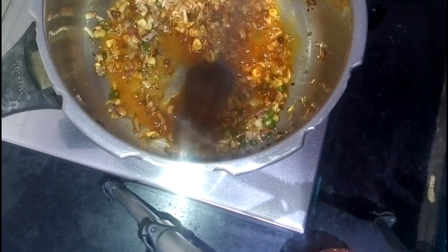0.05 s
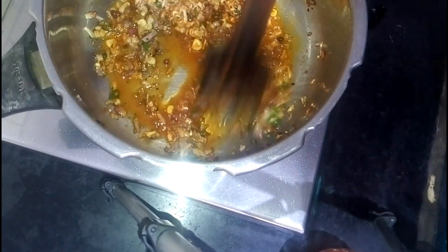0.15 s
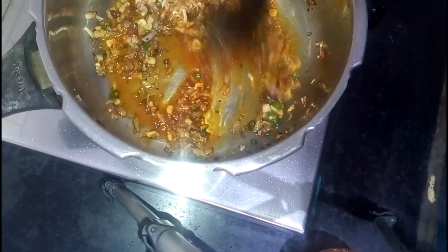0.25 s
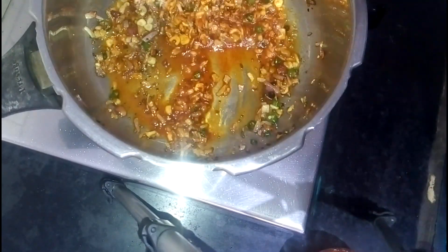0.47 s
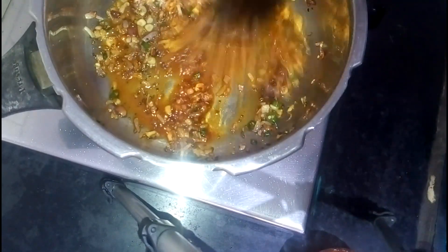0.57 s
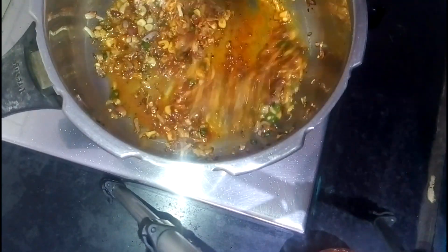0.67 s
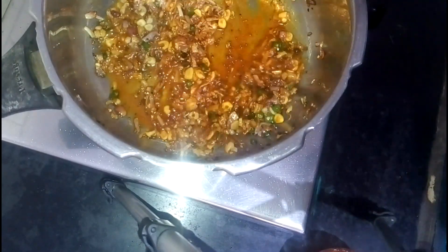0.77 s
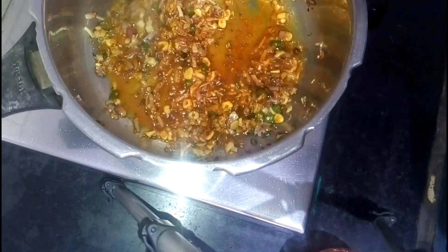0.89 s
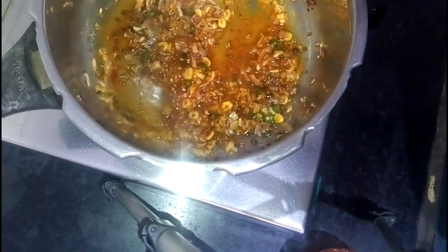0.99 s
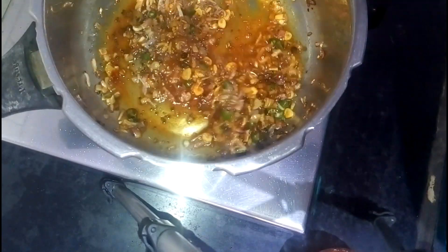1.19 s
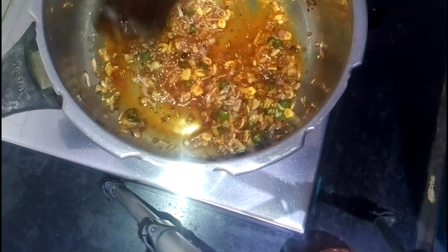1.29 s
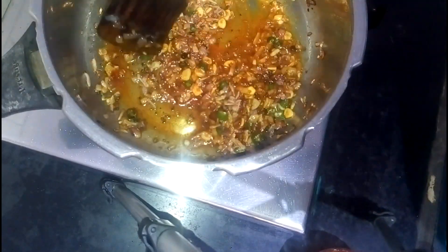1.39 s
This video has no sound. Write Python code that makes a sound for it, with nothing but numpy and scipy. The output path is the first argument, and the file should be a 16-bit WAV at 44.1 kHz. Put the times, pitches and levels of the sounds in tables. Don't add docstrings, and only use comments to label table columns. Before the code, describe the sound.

Close mono phone pickup of frying in a heavy metal pot: constant fizzing and crackling, a dull spatula touch and scrape, one loud ringing knock midway, then softer scraping, small oil spits and low pot thumps.

```python
import sys
import numpy as np
from scipy import signal
from scipy.fft import rfft, irfft, next_fast_len
from scipy.io import wavfile
from scipy.ndimage import uniform_filter1d, map_coordinates

SR = 44100
rng = np.random.default_rng(int(sys.argv[2]) if len(sys.argv) > 2 else 0)


def persist_wave(psi):
    counts = np.round(np.clip(psi, -1, 1) * 32767).astype(np.int16)
    wavfile.write(sys.argv[1], SR, np.atleast_2d(counts).T)


def makeup_ratio(level_db):
    decades = np.asarray(level_db, float) / 20
    return 10 ** decades


N = 63945

# mode_hz, twin_hz
WALL_PAIRS_HZ = [(213, 207), (381, 390), (586, 560), (666, 646), (904, 800), (1061, 1110), (1436, 1318),
                 (1533, 1526), (2352, 2335), (2762, 2740), (3381, 3392), (4475, 4507), (4868, 4916),
                 (5346, 5577)]
# level_db, twin_db (relative to the first), t60_s, swell_s
WALL_RING = [(5.5, -1, 0.098, 0.034), (-1, -18, .3, .025), (-7, -4, 0.14, .008), (-8.5, -8, 0.42, 0.0014),
             (-9.5, -8.5, 0.35, 0.02), (-11, -19, 0.48, 0.0023), (-6.5, -5, 0.26, 0.00057),
             (-11.5, 5, 0.24, 0.0011), (-16.5, -10, 0.44, 0.00047), (-22, 2, 0.36, 0.0014),
             (-5.5, -32, 0.27, 0.0017), (-19, -5, 0.51, .001), (-14, 2, 0.4, .001), (-9, 2, 0.27, 0.00072)]


def unit(x):
    return x / np.sqrt(np.mean(x ** 2) + 1e-20)


def along(points, hz):
    f, v = np.transpose(points)
    return np.interp(np.log(hz + 1), np.log(f + 1), v)


def curve(rows):
    return np.interp(np.arange(N) / SR, *np.transpose(rows))


def wobble(rate):
    knots = rng.standard_normal(int(N * rate / SR) + 4)
    return map_coordinates(knots, [np.arange(N) * rate / SR])


def filtered(x, response):
    m = next_fast_len(len(x) + SR // 2)
    return irfft(rfft(x, m) * response(np.fft.rfftfreq(m, 1 / SR)), m)[:len(x)]


def rush(spectrum, patchy_db):
    z = signal.stft(rng.standard_normal(N), nperseg=256)[2]
    field = uniform_filter1d(rng.standard_normal(z.shape), size=6, axis=0)
    field = uniform_filter1d(field, size=5, axis=1)
    x = signal.istft(z * makeup_ratio(patchy_db * unit(field)), nperseg=256)[1][:N]
    return unit(filtered(x, lambda hz: makeup_ratio(along(spectrum, hz))))


def bubbles():
    per_s, centre_hz, spread_log, size_db, cycles = 1500, 5110, 0.425, 0.5, 4
    u, g = rng.random((6000, 2)), rng.standard_normal(6000)
    live = np.arange(6000) < per_s * N / SR
    hz = np.clip(centre_hz * np.exp(spread_log * g), 800, 14000)[:, None]
    t = np.arange(192) / SR
    size = live * makeup_ratio(-size_db * np.log(1 - .97 * u[:, 1]))
    envelope = np.exp(-t * hz / cycles) * (1 - np.exp(-t * hz))
    grains = size[:, None] * np.sin(2 * np.pi * hz * t) * envelope
    at = (u[:, :1] * N).astype(int) + np.arange(192)
    crackle = np.bincount(at.ravel(), grains.ravel(), N + 192)[:N]
    return unit(filtered(crackle, lambda f: f / (f + 1500)))


def sizzle():
    # time_s, level_db
    frying = [(0, -45.5), (.2, -44), (.5, -45), (.85, -44.5), (1.08, -43.5), (1.25, -45), (1.45, -44.5)]
    # freq_hz, density_db_per_hz
    fizz = [(180, -34), (350, -12.5), (1250, -6.5), (1800, -8), (3500, -6.5), (5600, 0), (9000, -10),
            (15500, -10)]
    # start_s, peak_db, pitch_hz
    spits = [(.4643, -38, 6000), (.4918, -35, 5500), (1.0308, -31, 5000), (1.060, -33, 6000),
             (1.071, -33, 8000), (1.321, -37, 14000), (1.3917, -30, 5600), (1.393, -31, 10000),
             (1.426, -36, 5500), (1.336, -36, 5500), (.345, -34, 2100), (1.085, -36, 2000)]
    crackle_db, spit_db, spit_t60_s = -9, -8, .02
    strength = makeup_ratio(curve(frying) + 1.1 * wobble(40.53))
    hiss = rush(fizz, patchy_db=1.0)
    out = np.pad(strength * (hiss + makeup_ratio(crackle_db) * bubbles()), (0, SR))
    t = np.arange(2048) / SR
    for s, db, hz in spits:
        puff = filtered(rng.standard_normal(2048), lambda f: np.exp(-(np.log((f + 1) / hz) / 0.3) ** 2))
        out[round(s * SR):][:2048] += makeup_ratio(db + spit_db - 60 * t / spit_t60_s) * unit(puff)
    return out[:N]


def kitchen():
    # freq_hz, density_db_per_hz
    room = [(15, -57), (30, -18), (60, -10), (105, -4.5), (200, -14.5), (480, -26.5), (640, -45),
            (1200, -3.5)]
    return makeup_ratio(-60) * rush(room + [(1500, -120)], patchy_db=-2.5)


def scrape():
    # time_s, level_db
    pressure = [(0, -59), (.215, -92), (.232, -46), (.29, -47), (.325, -46), (.35, -40.5), (.385, -46.5),
                (.5, -53), (.57, -54), (.6, -35.5), (.75, -48.5), (.99, -51.5), (1.034, -41),
                (1.046, -45.5), (1.075, -43), (1.135, -47), (1.165, -43.5), (1.215, -45.5), (1.235, -51),
                (1.45, -54)]
    # freq_hz, density_db_per_hz
    bare = [(150, -9), (300, 4), (1000, -3), (2200, -7), (3500, -5), (5500, -3), (8000, -12), (15000, -24)]
    # freq_hz, density_db_per_hz
    spiced = [(150, -9), (300, 4), (1000, -1.5), (2200, -0.5), (3000, 1.5), (5500, 3.5), (8000, -5),
              (15000, -4.5)]
    ring_db, stir_from_s, grit_per_s, grit_db = -9.5, 0.844, 200, 2

    def wall(f, width_hz=30):
        return sum(makeup_ratio(row[0]) * 1j * f * width_hz / (c * c - f * f + 1j * f * width_hz)
                   for (c, _), row in zip(WALL_PAIRS_HZ, WALL_RING))

    late = np.clip((np.arange(N) / SR - stir_from_s) * 10, 0, 1)
    rub = (1 - late) * rush(bare, patchy_db=0.0) + late * rush(spiced, patchy_db=2.0)
    rub = rub + makeup_ratio(ring_db) * unit(filtered(rng.standard_normal(N), wall))
    return makeup_ratio(curve(pressure) + 1.2 * wobble(40.4) + grit_db * wobble(grit_per_s)) * unit(rub)


def wall_modes(t, hard):
    # freq_hz, level_db, t60_s, swell_s
    knock = [(1076, -10, .22, .003), (658, 0, .12, .012), (1450, -3, .08, .001), (4780, -14, .25, .002),
             (4812, -15, .25, .002), (4398, -16, .25, .002), (3500, -16, .25, .002), (4100, -8, .1, .001),
             (2550, -17, .25, .002), (2620, -17, .2, .002), (5310, -16, .2, .002), (5927, -18, .21, .002),
             (1730, -22, .2, .002), (830, -12, .08, .002)]
    flutter_db, flutter_per_s = 1.3, 53.5
    modes = np.zeros(len(t))
    for (hz, twin_hz), (level, twin_db, t60, swell) in zip(WALL_PAIRS_HZ, WALL_RING):
        flutter = flutter_db * np.log1p(hz / 1000) * wobble(flutter_per_s)[:len(t)]
        pair = np.sin(2 * np.pi * hz * t) - makeup_ratio(twin_db) * np.sin(2 * np.pi * twin_hz * t)
        modes += makeup_ratio(level - 60 * t / t60 + flutter) * (1 - np.exp(-t / swell)) * pair
    for hz, level, t60, swell in knock:
        modes += hard * makeup_ratio(level - 60 * t / t60) * (1 - np.exp(-t / swell)) * np.sin(2 * np.pi * hz * t)
    return modes


def blows():
    # start_s, peak_db, hardness (0-1), ring_db, body_db
    hits = [
        (0.2239, -22, 0.09, -7.5, 7.5),
        (0.575, -8, 0.85, 5.5, 2),
    ]
    # centre_hz, width_hz, level_db
    clusters = [(401, 77, -4.5), (651.4, 78, -3.5), (1068, 110, 0.5), (1490, 340, -1), (2253, 157, 3),
                (2778, 210, 3.5), (3510, 220, 0), (4040, 144, -1), (4440, 130, -1.5), (4886, 190, 2.5),
                (5400, 390, -5.5), (6350, 660, -7), (6830, 790, -2)]
    # freq_hz, density_db_per_hz
    clang_spectrum = [(150, -39), (400, 6.5), (700, 6), (1500, 0), (1900, -4.5), (5000, 6), (7200, -2.5),
                      (16000, 4)]
    # freq_hz, t60_s
    clang_t60 = [(300, 0.74), (1500, 0.24), (5000, 0.27), (8000, 0.2), (14000, 0.055)]
    # freq_hz, density_db_per_hz
    crack_spectrum = [(200, -26), (800, -10), (2000, -9), (5500, 2), (7500, -4), (11000, -16), (16500, -13)]
    clang_db, strike_db, crack_db, crack_t60_s = -17.5, 7, -5.5, 0.027
    soft_hz, hard_hz = 480, 29300

    def bunches(f):
        return 0.047 + sum(makeup_ratio(db) * 1j * f * w / (c * c - f * f + 1j * f * w) for c, w, db in clusters)

    out, t = np.zeros(N + SR), np.arange(SR // 2) / SR
    strike = sum(makeup_ratio(db) * np.sin(2 * np.pi * (c * t + rng.random())) * np.exp(-np.pi * w * t / 2)
                 for c, w, db in clusters)
    strike = unit(strike * (1 - np.exp(-t / 0.0022))) / 20
    for s, db, hard, ring_db, body_db in hits:
        modes = wall_modes(t, hard)
        f, frames, z = signal.stft(rng.standard_normal(len(t)), SR, nperseg=128)
        z = z * makeup_ratio(along(clang_spectrum, f)[:, None] - 60 * frames / along(clang_t60, f)[:, None])
        clang = filtered(signal.istft(z, SR, nperseg=128)[1][:len(t)], bunches)
        clang = clang / clang[:400].std() * (1 - np.exp(-t / 0.00019))
        edge_hz = soft_hz * (hard_hz / soft_hz) ** hard
        body = makeup_ratio(ring_db - 18.5) * modes + makeup_ratio(clang_db + body_db) * (clang + makeup_ratio(strike_db) * strike)
        body = filtered(body, lambda f: 1 / (1 + 1j * f / edge_hz) ** 2)
        crack = unit(filtered(rng.standard_normal(len(t)), lambda f: makeup_ratio(along(crack_spectrum, f))))
        crack = makeup_ratio(crack_db - 60 * t / crack_t60_s) * (1 - np.exp(-t / 0.0014)) * crack
        out[round(s * SR):][:len(t)] += makeup_ratio(db) * (body + crack)
    return out[:N]


def nudges():
    # start_s, level_db, pitch_hz, t60_s
    tones = [(0.23, -45, 669, 0.55), (0.26, -52, 394, 0.88), (0.422, -67, 780, 0.45),
             (1.06, -50, 386, .5), (1.105, -50, 2750, .2), (1.198, -51.5, 420, 0.35),
             (1.148, -48.5, 1100, 0.38), (0.257, -48, 840, .2), (0.273, -53, 1070, .2),
             (0.358, -54, 570, .4), (1.055, -56, 2700, 0.48), (1.075, -53, 1180, 0.16),
             (1.1, -45, 1000, 0.17), (1.4, -54, 1400, 0.14), (1.032, -39, 6500, .08),
             (1.034, -44, 4500, .08), (1.058, -41, 6350, .08), (1.07, -42, 5900, .08),
             (1.094, -45, 3000, 0.09), (1.118, -46.5, 3300, 0.088), (1.158, -50, 5400, .07),
             (1.16, -47, 3950, .08), (1.181, -45, 6400, .08), (1.214, -42, 5100, .08),
             (.3, -52.5, 665, .5), (.348, -41, 5500, .06)]
    swell_share = 0.017
    t, out = np.arange(N) / SR, np.zeros(N)
    for s, db, hz, t60 in tones:
        since = (t - s).clip(0)
        swell = 1 - np.exp(-since / (swell_share * t60))
        out += makeup_ratio(db - 60 * since / t60 + 1.1 * wobble(32.0)) * swell * np.sin(2 * np.pi * hz * t)
    return out


def rocking():
    # peak_s, level_db, length_s
    thumps = [
        (0.233, -48, 0.0084),
        (0.328, -50, 0.061),
        (0.432, -56.5, 0.039),
        (0.616, -50.5, 0.024),
        (0.683, -52.5, 0.025),
        (0.746, -53, 0.026),
        (0.996, -46.5, 0.0094),
        (1.127, -57.5, 0.051),
        (1.283, -53.5, 0.03),
    ]
    # freq_hz, density_db_per_hz
    rumble = [(25, -35), (50, -21), (85, -6.5), (115, -13.5), (160, -17), (300, -25)]
    grate_hz, rough_db = 86, 6
    t = np.arange(N) / SR
    power = sum(makeup_ratio(2 * db) * np.exp(-((t - s) / length) ** 2) for s, db, length in thumps)
    tone = np.sqrt(2) * np.sin(2 * np.pi * grate_hz * np.cumsum(1 + .06 * wobble(6.8)) / SR)
    return np.sqrt(power) * unit(tone + makeup_ratio(rough_db) * rush(rumble, patchy_db=-7.0))


def floor_hum():
    # peak_s, rms_db, pitch_hz, rise_s, fall_s
    pushes = [(0.25, -32, 228.1, 0.012, 0.019), (.32, -42, 235.1, 0.02, 0.018),
              (0.373, -35, 234.3, 0.024, 0.015), (0.438, -45.5, 244.9, 0.014, 0.041),
              (0.529, -64, 236.8, 0.025, 0.012), (0.62, -30.5, 241.7, 0.023, 0.039),
              (0.736, -33, 240.8, 0.035, 0.035), (.84, -45.5, 238.8, 0.06, 0.023),
              (.974, -42, 231, .03, .011), (1.004, -38.5, 235, .008, .015), (1.186, -41, 233, .016, .014),
              (1.08, -43, 243.4, 0.037, 0.032), (1.215, -57, 227, .015, 0.02),
              (1.255, -51.5, 241.3, 0.027, 0.024)]
    plateau = 2.3
    rest_db, flutter_db = -62, 1.4
    t = np.arange(N) / SR
    power = np.array([makeup_ratio(2 * db) * np.exp(-np.abs((t - s) / np.where(t < s, rise, fall)) ** plateau) + 1e-12
                      for s, db, _, rise, fall in pushes])
    total = power.sum(axis=0)
    hz = np.array(pushes)[:, 2] @ power / total
    in_pot = (t > pushes[0][0]) * (t < pushes[-1][0])
    level = np.sqrt(2 * (total + makeup_ratio(2 * rest_db) * in_pot)) * makeup_ratio(flutter_db * wobble(60.2))
    return level * np.sin(2 * np.pi * np.cumsum(hz + 5 * wobble(25.4)) / SR)


def scene():
    mono = sizzle() + kitchen() + scrape() + blows() + nudges() + rocking() + floor_hum()
    return np.array([mono, mono])


def band_limit(x):
    return signal.sosfilt(signal.butter(12, 16480, fs=SR, output="sos"), x)


def record(dry):
    shelf_hz, shelf_db, shelf_width_log, top_hz, above_top_db = 7210, -10.5, 0.028, 15500, -42

    def mic(f):
        shelf = shelf_db / (1 + np.exp(-np.log((f + 1) / shelf_hz) / shelf_width_log))
        return makeup_ratio(shelf + above_top_db * (f > top_hz))

    heard = filtered(dry[0], mic)
    return band_limit(np.array([heard, heard]))


dry = scene()
out = record(dry)
persist_wave(out)
```